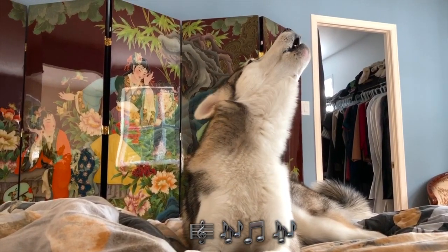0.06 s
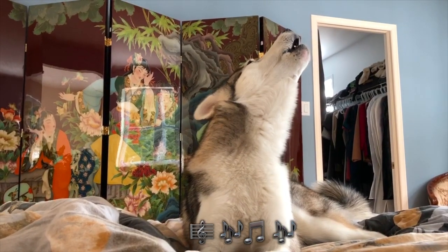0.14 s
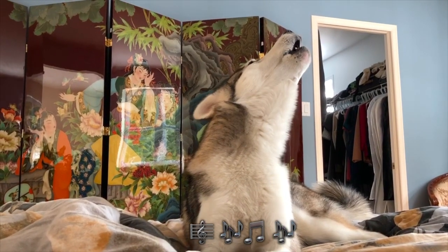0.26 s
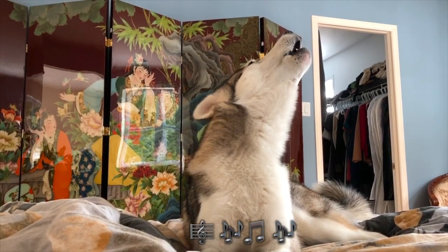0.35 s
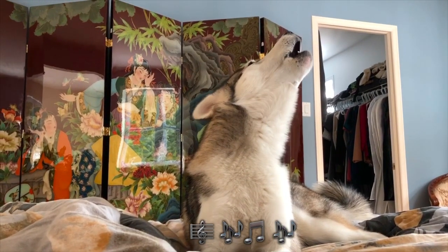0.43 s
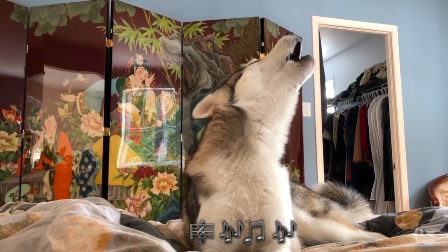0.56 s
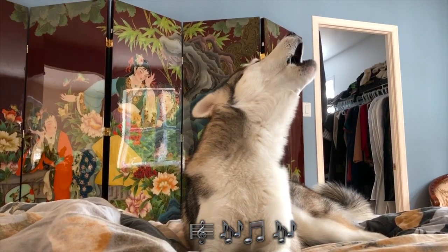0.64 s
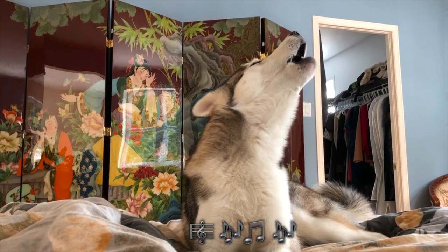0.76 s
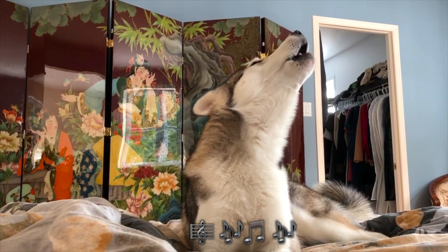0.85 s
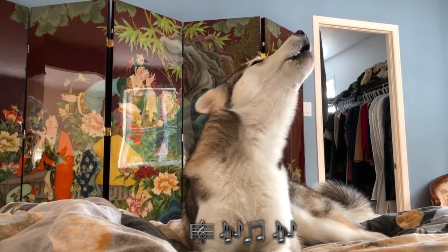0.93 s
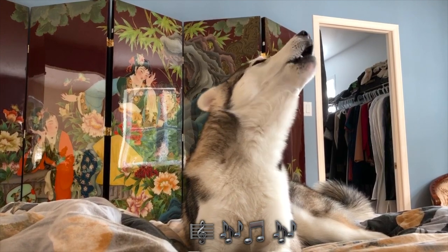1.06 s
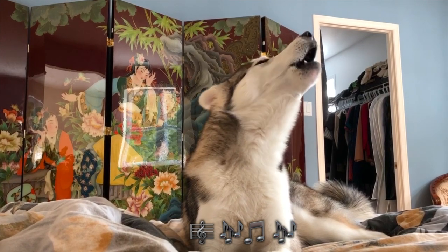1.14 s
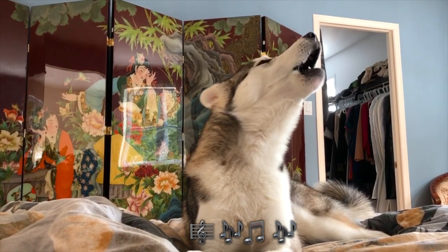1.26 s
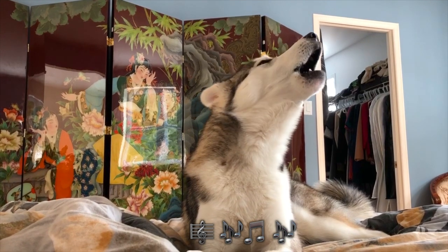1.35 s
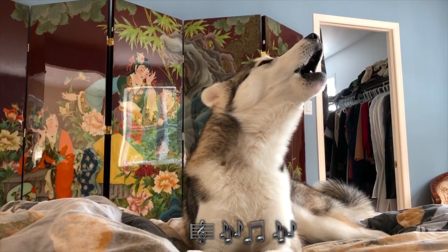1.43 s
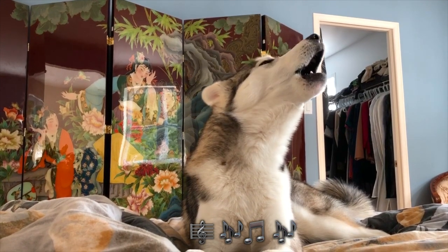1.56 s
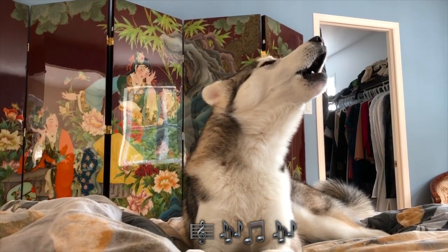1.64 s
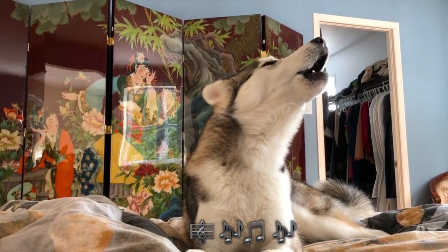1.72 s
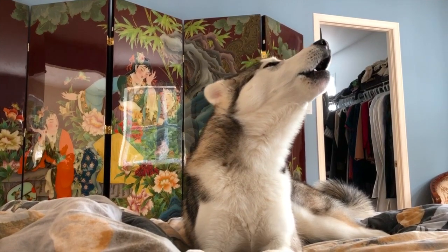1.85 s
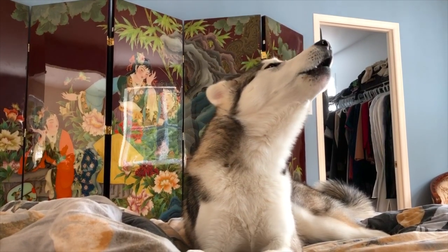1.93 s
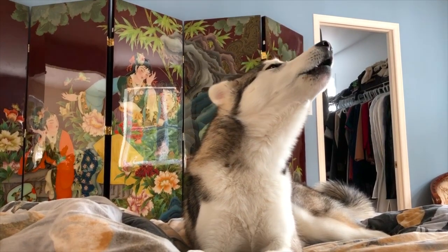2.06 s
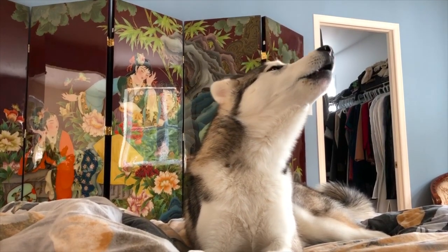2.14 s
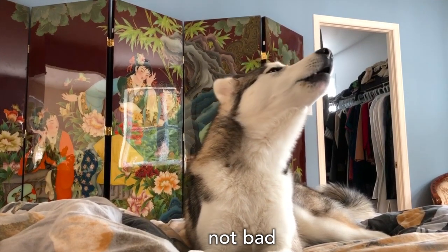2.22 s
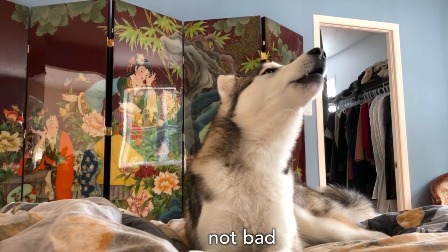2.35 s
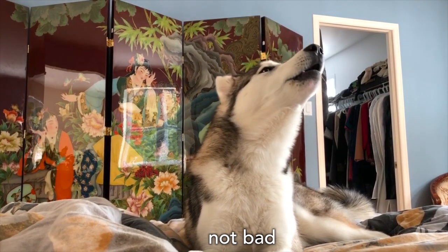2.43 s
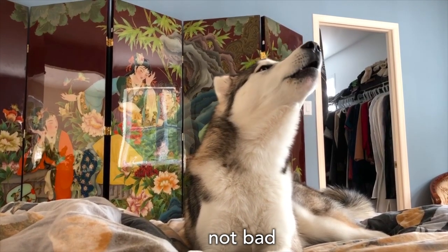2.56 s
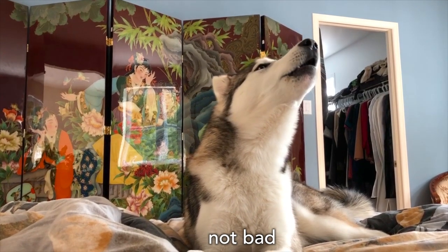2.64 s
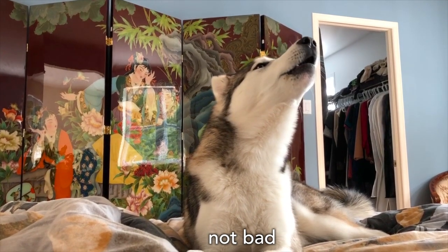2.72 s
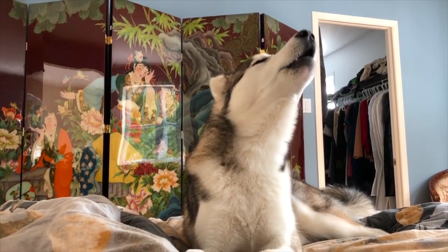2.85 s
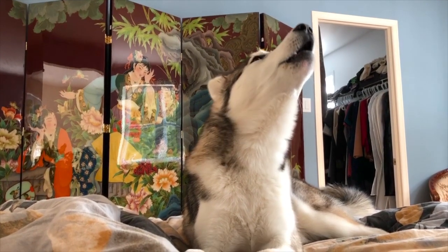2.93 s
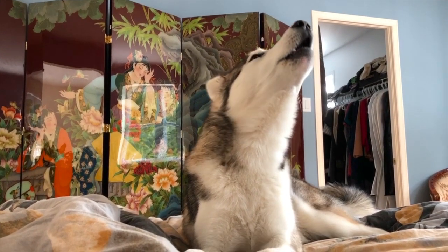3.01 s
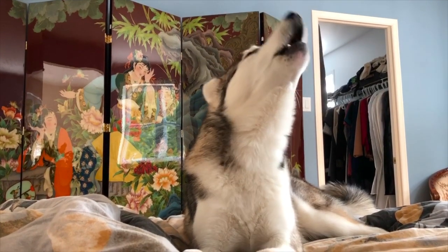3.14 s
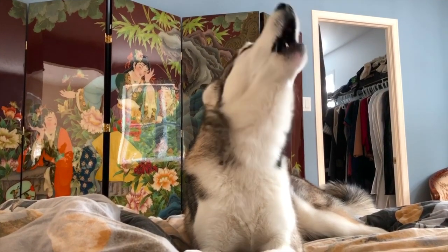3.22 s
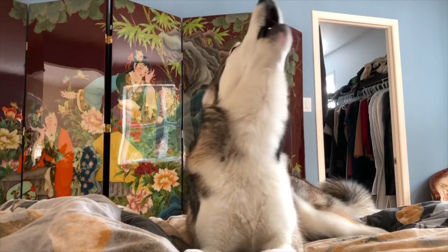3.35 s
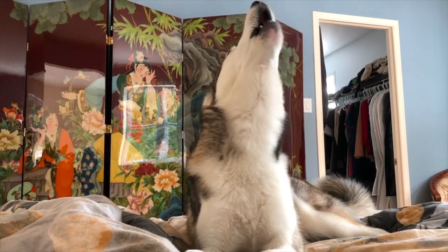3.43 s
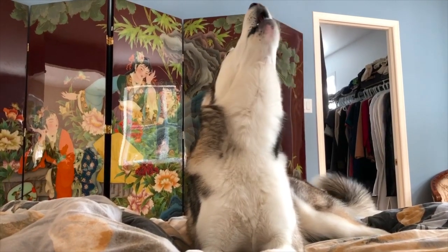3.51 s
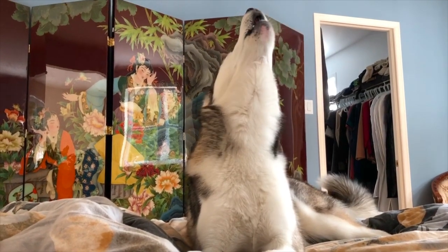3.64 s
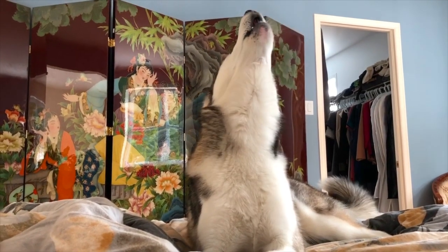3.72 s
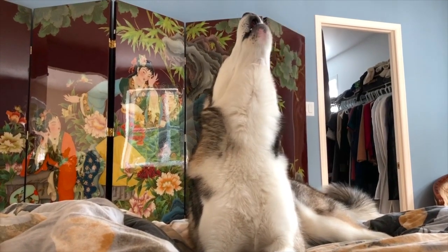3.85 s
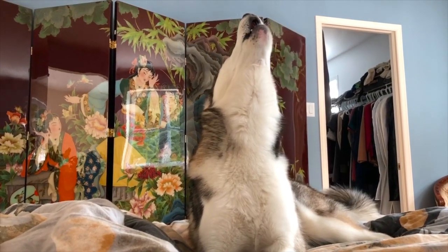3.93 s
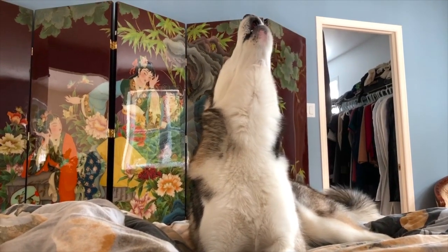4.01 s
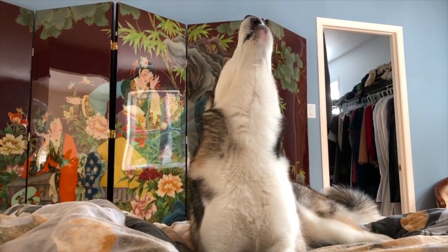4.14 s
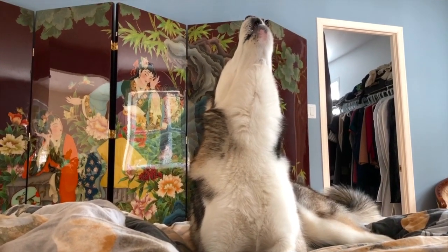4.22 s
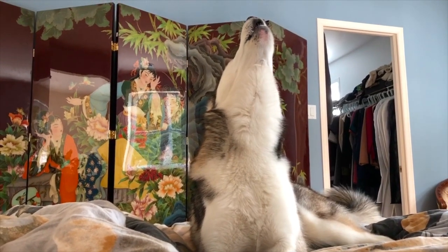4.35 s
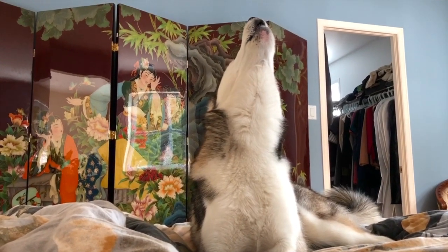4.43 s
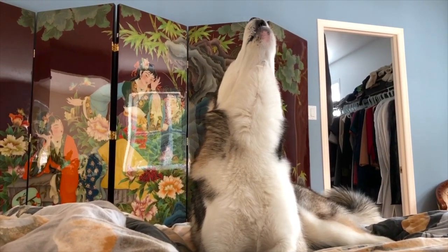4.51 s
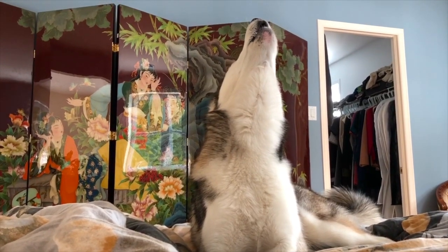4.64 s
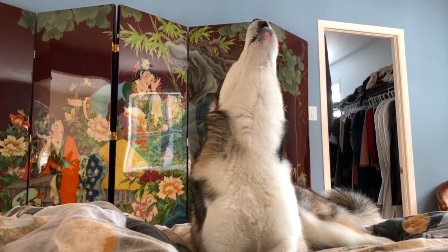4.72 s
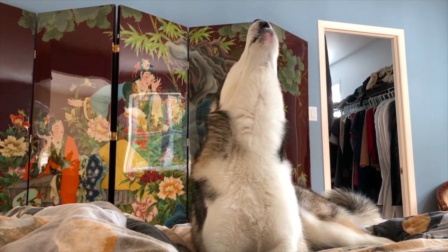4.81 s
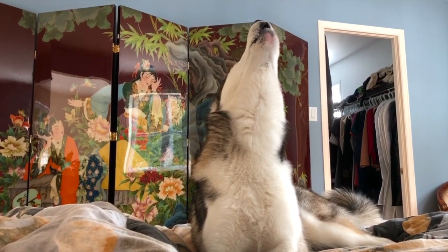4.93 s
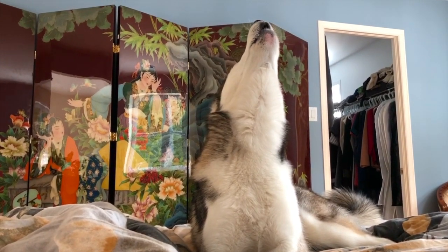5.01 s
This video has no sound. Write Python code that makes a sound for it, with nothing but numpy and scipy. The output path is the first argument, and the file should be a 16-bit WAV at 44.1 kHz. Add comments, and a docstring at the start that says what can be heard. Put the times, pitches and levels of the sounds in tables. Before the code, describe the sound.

In a quiet bedroom with a slight echo, a nearby dog holds a howl that rises and dips, then drops away. A faint, dull howl carries on in the distance while the covers rustle and thump softly. Then the near dog breaks hoarsely into a second, higher howl that slides gradually lower, with the far voice briefly rising underneath it.

```python
"""One long, wavering howl from a husky on a bed, close to the microphone in a small, quiet bedroom.
After a pause a hoarse attack with low puffs breaks into a higher register and sinks back. The vocal
folds give three strong harmonics, the muzzle shapes a bright edge above them, and air escapes with
every cycle. A far fainter howl sounds twice from further off, and the bedding thumps and rustles
softly as the dog shifts. The walls answer briefly, over faint room air and mains hum."""
import sys
import numpy as np
from scipy import signal
from scipy.fft import rfft, irfft, next_fast_len
from scipy.io import wavfile
from scipy.ndimage import uniform_filter1d, map_coordinates

SR = 44100
rng = np.random.default_rng(int(sys.argv[2]) if len(sys.argv) > 2 else 0)


def inscribe(sig):
    """Save sig as 16-bit PCM at rate SR to the path in sys.argv[1].

    A 1-D sig is mono; a 2-D sig holds one channel per row.
    Samples are clipped to [-1, 1] before scaling.
    """
    pcm = np.round(np.clip(np.atleast_2d(sig).T, -1, 1) * 32767)
    wavfile.write(sys.argv[1], SR, pcm.astype(np.int16))


N = 223807
TOP_HZ = 15700  # band limit of the phone


def amp(db):
    """Decibels to gain."""
    return 10 ** (np.asarray(db) / 20)


def along(points, hz):
    """Read (freq_hz, value) points on a log frequency axis."""
    freq_hz, values = np.transpose(points)
    return np.interp(np.log(hz + 1), np.log(freq_hz + 1), values)


def curves(rows):
    """One value per sample for each column after the time."""
    time_s, *columns = np.transpose(rows)
    return [np.interp(np.arange(N) / SR, time_s, column) for column in columns]


def glide(rows):
    """Curves with rounded corners, as muscles move."""
    return [uniform_filter1d(curve, size=500) for curve in curves(rows)]


def sounding(rows, fade_s):
    """1 during the span of a table, fading quickly outside it."""
    t = np.arange(N) / SR
    outside_s = np.maximum(0, np.maximum(rows[0][0] - t, t - rows[-1][0]))
    return np.exp(-(outside_s / fade_s) ** 2)


def wobble(rate_hz):
    """A smooth random curve through rate_hz knots a second."""
    step = max(1, int(SR / rate_hz / 6))
    coarse = np.arange(0, N + step, step)
    knots = rng.standard_normal(int(N * rate_hz / SR) + 4)
    spline = map_coordinates(knots, [coarse * rate_hz / SR], mode="nearest")
    return np.interp(np.arange(N), coarse, spline)


def filtered(x, response):
    """Apply a gain that depends on frequency."""
    size = next_fast_len(N + SR // 2)
    return irfft(rfft(x, size) * response(np.fft.rfftfreq(size, 1 / SR)), size)[..., :N]


def coloured(x, colour):
    """Filter by (freq_hz, gain_db) points."""
    return filtered(x, lambda hz: amp(along(colour, hz)))


def noise(colour):
    """Coloured noise of rms 1."""
    x = coloured(rng.standard_normal(N), colour)
    return x / np.sqrt(np.mean(x ** 2) + 1e-20)


def room_tone():
    """Very faint room air with a mains hum."""
    # spectrum of the still room: freq_hz, gain_db
    air_colour = [(25, 0.5), (80, -3), (200, -11), (600, -4.5), (2000, -21.5), (8000, -35), (15000, -19.5)]
    hum = np.sin(2 * np.pi * 119 * np.arange(N) / SR) * (1 + .15 * wobble(5.5))
    return amp(-80) * noise(air_colour) + amp(-82.5) * hum


def bedroom(x):
    """The nearby walls answer with a short tail that lasts longest in the midrange."""
    # reverberation time: freq_hz, t60_s
    decay = [(120, 0.077), (500, 0.47), (1400, 0.53), (6000, 0.24), (14000, 0.37)]
    hz, t, bands = signal.stft(rng.standard_normal(SR * 3 // 4), SR, nperseg=256)
    tail = signal.istft(bands * amp(-60 * t / along(decay, hz)[:, None]), SR, nperseg=256)[1]
    impulse = np.pad(tail / np.linalg.norm(tail), (200, 0))  # arrives 4.5 ms late
    wet = signal.fftconvolve(x, impulse)[:N]
    # the raised muzzle throws the treble at the walls
    return coloured(wet, [(150, -14), (500, -7), (1400, -8), (3000, -2.5), (6000, -3)])


def puffs(rows, colour, rise_s):
    """Short swells of noise, each falling 40 dB over its length."""
    t = np.arange(N) / SR
    envelope = np.zeros(N)
    for start_s, level_db, length_s in rows:
        age_s = np.maximum(t - start_s, 0)
        envelope += amp(level_db - 40 * age_s / length_s) * (1 - np.exp(-age_s / rise_s))
    return envelope * noise(colour)


def rustle_and_thumps():
    """Rustling covers and soft low thumps as the dog shifts; stronger low puffs with the hoarse attack."""
    # low thumps and puffs, and small crinkles of cloth: start_s, level_db, length_s
    low_events = [(2.475, -47, 0.067), (2.84, -49.5, 0.16), (3.208, -25.5, 0.058), (3.335, -39, 0.061),
                  (3.41, -51, 0.082)]
    crinkle_events = [(2.115, -54.5, 0.017), (2.345, -61.5, .02), (2.47, -57.5, 0.021), (2.835, -53, 0.025),
                      (2.865, -57.5, 0.097)]
    # fur rubbing on the covers: time_s, level_db
    rustle_levels = [(0, -95), (1.9, -89.5), (2.25, -72), (2.42, -69.5), (2.62, -68.5), (2.78, -66.5),
                     (2.87, -66.5), (2.95, -69), (3.2, -63), (3.43, -55.5), (3.52, -80)]
    # spectra of the low thumps and puffs, the rubbing and the crinkles: freq_hz, gain_db
    low_colour = [(25, -10), (70, -6), (130, 10.5), (230, 11), (400, -18), (900, -20), (3000, -61)]
    rustle_colour = [(25, -11.5), (80, -2.5), (220, -7.5), (600, -12.5), (1500, -21.5), (4000, -25),
                     (7500, -21.5), (11000, -37), (15000, -48)]
    crinkle_colour = [(500, -5), (3000, -10.5), (7000, -5), (11000, -20.5), (15000, -25)]
    crinkles = puffs(crinkle_events, crinkle_colour, rise_s=.0038)
    rustle_db, = curves(rustle_levels)
    rustle = amp(rustle_db) * noise(rustle_colour)
    return rustle + puffs(low_events, low_colour, rise_s=.0034) + crinkles


def fold_phase(pitch, rough, jitter, waver):
    """Phase of the vocal folds: a slow waver, and cycle jitter that grows with roughness."""
    unsteady = 1 + waver * wobble(35) + jitter * rough * wobble(400)
    hz = uniform_filter1d(pitch, size=500) * unsteady
    return 2 * np.pi * np.cumsum(hz) / SR


def overtones(pitch, phase, active, colour, jaw, drift_db, blur_rad, orders):
    """Upper harmonics through a colour; they share a constant power, trading it as they drift."""
    samples = np.flatnonzero(active)
    coarse = samples[::64]

    def drift(hop):
        """A random line with a knot every hop samples."""
        knots = np.arange(0, N, hop)
        return np.interp(coarse, knots, rng.standard_normal(len(knots)))

    gains = []
    for k in orders:
        hz = k * pitch[coarse]
        gain_db = along(colour, hz / jaw[coarse]) + drift_db * drift(4400)
        gains.append(amp(gain_db) * (hz < TOP_HZ))
    gains = np.array(gains) / np.linalg.norm(gains, axis=0)
    tone = np.zeros(N)
    for k, gain in zip(orders, gains):
        phase_blur = np.interp(samples, coarse, blur_rad * drift(700))
        tone[samples] += np.interp(samples, coarse, gain) * np.sin(k * phase[samples] + phase_blur)
    return tone


def far_howl(rows, upper_db):
    """A dull, nasal howl from further off; its overtones waver on the way."""
    # resonances of the distant voice: freq_hz, gain_db
    nasal_colour = [(880, -12), (1000, -20.5), (1350, -24.5), (1780, -46.5), (2220, -22), (2650, -54),
                    (3080, -19), (3550, -40.5), (4500, -57.5), (5400, -43), (6500, -54)]
    pitch, level_db = glide(rows)
    gate = sounding(rows, fade_s=.057)
    phase = fold_phase(pitch, rough=.05, jitter=.15, waver=.0064)
    upper = overtones(pitch, phase, gate > 1e-4, nasal_colour, jaw=np.ones(N),
                      drift_db=8.5, blur_rad=1.5, orders=range(2, 14))
    return np.sqrt(2) * gate * amp(level_db) * (np.sin(phase) + amp(upper_db) * upper)


def distant_howls():
    """Two faint calls well away from the microphone: one sinks, the later, brighter one rises."""
    # course of each call: time_s, pitch_hz, level_db
    sinking = [(1.5, 537, -54), (1.95, 514.7, -47.5), (2.12, 473.7, -47), (2.24, 458, -39),
               (2.41, 474, -46), (2.5, 451.4, -36.5), (2.68, 436.7, -39), (2.88, 451.6, -40.5),
               (2.95, 431, -35.5), (3.08, 421.3, -41), (3.17, 412, -48.5)]
    rising = [(4.35, 417.6, -44.5), (4.7, 470, -44.5), (4.78, 483, -52.5), (5.07, 526, -45)]
    return far_howl(sinking, upper_db=-21.5) + far_howl(rising, upper_db=-11.5)


def flutter(x, gap_s=.097, scatter_s=.022, shallow_db=-4, width_s=.0043):
    """The lowest tone, around 460 Hz, dips briefly again and again and trembles faintly in between."""
    # the deepest dips, among many shallow, loosely spaced ones: time_s, depth_db
    deep_dips = [(.689, -18.5), (.86, -7), (.996, -19), (1.681, -15), (2.171, -13), (2.343, -12),
                 (2.406, -17), (2.66, -22), (2.898, -19), (3.051, -12), (4.57, -5.5)]
    chance = rng.standard_normal((120, 2))
    shallow_times = gap_s * np.arange(len(chance)) + scatter_s * chance[:, 0]
    shallow_depths = shallow_db * np.abs(1 + .6 * chance[:, 1])
    dips = np.vstack([deep_dips, np.column_stack([shallow_times, shallow_depths])])
    time_s, depth_db = dips[(dips[:, 0] > 0) & (dips[:, 0] < (N - 1) / SR)].T
    marks = np.bincount(np.round(time_s * SR).astype(int), depth_db, N)
    lag_s = np.arange(-2000, 2001) / SR
    dip_db = signal.fftconvolve(marks, np.exp(-(lag_s / width_s) ** 2), "same")
    tremble = .016 * np.sin(2 * np.pi * 172 * np.arange(N) / SR) + .045 * wobble(100)
    lowest_tone = filtered(x, lambda hz: 1 / (1 + ((hz - 460) / 130) ** 8))
    change = lowest_tone * (amp(dip_db) - 1 + tremble)
    return x + filtered(change, lambda hz: 1 / (1 + ((hz - 470) / 190) ** 8))


def roughness(clear=.011):
    """A clear voice that cracks hoarse for a moment where it starts, stops or changes register."""
    # cracks of the voice: time_s, roughness (0-1), width_s
    cracks = [(1.933, .1, 0.029), (3.21, .4, .018), (3.281, .06, 0.048), (3.353, 0.15, 0.015),
              (4.221, 0.03, 0.098)]
    t = np.arange(N) / SR
    return clear + sum(rough * np.exp(-((t - time_s) / width_s) ** 2) for time_s, rough, width_s in cracks)


def resonance_gain(hz):
    """A gliding harmonic swells and fades as it passes through the resonances of mouth and room."""
    # response of mouth and room: freq_hz, gain_db
    resonances = [(350, -6), (420, -3), (490, 1.5), (645, -2), (680, -10.5), (890, -13.5), (950, -21),
                  (1000, -19.5), (1035, -12), (1140, -8.5), (1280, 2), (1335, 6), (1400, -2.5), (1440, 3.5),
                  (1505, -8), (1560, 1), (1850, -9), (1950, -2), (2110, -9)]
    # narrow bands that standing waves cancel at the microphone: centre_hz, width_hz, depth_db
    nulls = [(448.8, 4.5, -12.5), (502.5, 1.9, -5.5)]
    null_db = sum(depth * np.exp(-((hz - centre) / width) ** 2) for centre, width, depth in nulls)
    return uniform_filter1d(amp(along(resonances, hz) + null_db), size=500)


def howl(pitch_rows, effort_rows, edge_rows, throat, *,
         rest_hz, jaw_lift, press_db, edge_db, air_db, drift_db, blur_rad):
    """Three strong low harmonics, a bright edge of overtones shaped by the muzzle, and pulsing air."""
    # balance of the three lowest harmonics at the folds: gain_db
    low_harmonics = [0.5, -1.5, -17]
    # air rushing through the open throat: freq_hz, gain_db
    air_colour = [(300, -21), (550, 3), (1400, -.5), (2000, -23), (2650, -30), (3400, -7.5), (4150, -17),
                  (5400, -1.5), (6000, -7.5), (6800, -2), (7700, -8), (8350, -24), (9300, -16.5),
                  (10300, -28.5), (11600, -21.5), (13000, -45.5), (15500, -42.5)]
    pitch, = curves(pitch_rows)
    voice_db, = glide(effort_rows)
    bright_db, = glide(edge_rows)
    rough = roughness()
    gate = np.maximum(sounding(pitch_rows, fade_s=.004), sounding(edge_rows, fade_s=.004))
    phase = fold_phase(pitch, rough, jitter=.11, waver=.0013)
    body = np.zeros(N)
    for k, gain_db in enumerate(low_harmonics, 1):
        # pressed folds add press_db with each step up the harmonics
        body += amp(gain_db + press_db * (k - 1)) * resonance_gain(k * pitch) * np.sin(k * phase)
    # the jaw opens as the pitch rises, which shortens the tract and lifts its resonances
    jaw = (pitch / rest_hz) ** jaw_lift
    edge = overtones(pitch, phase, gate > 1e-6, throat, jaw, drift_db, blur_rad, orders=range(4, 30))
    tone = np.sqrt(2) * (amp(voice_db) * body + amp(bright_db + edge_db) * edge)
    tone *= 1 + .87 * rough * wobble(220)  # uneven cycles make the loudness shimmer
    tone *= 1 + np.maximum(rough - .05, 0) * np.sin(phase / 2)  # hoarse cycles alternate strong and weak
    # air escapes once a cycle, more of it when the voice is hoarse
    air = noise(air_colour) * (1 + .5 * np.cos(phase)) * amp(bright_db + air_db) * np.sqrt(rough)
    return gate * (tone + air)


def husky():
    """Close to the microphone: the long howl, then the hoarse attack that flips into the high howl."""
    # pitch of the vocal folds: time_s, pitch_hz
    long_pitch = [(0, 474.9), (.43, 475.2), (.558, 496.9), (.79, 521.2), (.89, 491.4), (.954, 457.7),
                  (1.032, 437.7), (1.226, 456), (1.352, 474.6), (1.482, 479.9), (1.602, 467), (1.7, 441.9),
                  (1.884, 423.4), (1.916, 410), (1.94, 358.7)]
    attack_pitch = [(3.2, 298.2), (3.218, 354), (3.228, 417.6), (3.25, 460.6), (3.28, 510.3), (3.3, 511.8),
                    (3.35, 561.3), (3.365, 615)]
    high_pitch = [(3.37, 688), (3.412, 700.6), (3.602, 673), (4.08, 637.2), (4.174, 598.4), (4.226, 566.7),
                  (4.25, 504), (4.472, 478.8), (4.808, 458.6), (4.936, 444.5), (5.07, 439.7)]
    # how hard the dog pushes the low harmonics: time_s, gain_db
    long_effort = [(.35, -25.5), (.55, -20.5), (0.651, -25.5), (.85, -19), (1.099, -21), (1.451, -21),
                   (1.72, -24.5), (1.9, -20.5), (1.951, -33.5)]
    attack_effort = [(3.201, -55), (3.21, -17.5), (3.231, -10.5), (3.251, -14.5), (3.288, -20),
                     (3.303, -13), (3.329, -22.5), (3.343, -16), (3.365, -27.5)]
    high_effort = [(3.356, -20.5), (3.4, -12), (3.56, -17), (3.72, -24.5), (3.85, -19.5), (4.1, -23.5),
                   (4.45, -21.5), (4.6, -24.5), (4.78, -20.5), (5.07, -21)]
    # strength of the bright edge and the air: time_s, gain_db
    long_edge = [(0.02, -44), (0.106, -46), (0.472, -40.5), (0.506, -43), (0.636, -33), (1.106, -45),
                 (1.122, -39), (1.354, -36.5), (1.954, -49), (1.96, -59)]
    attack_edge = [(3.2, -43.5), (3.23, -25), (3.256, -26), (3.274, -37), (3.284, -41.5), (3.302, -20.5),
                   (3.352, -37), (3.365, -32)]
    high_edge = [(3.358, -29.5), (3.562, -34.5), (3.82, -31.5), (4.016, -37.5), (4.072, -35), (4.206, -41),
                 (4.316, -37), (4.512, -42.5), (4.998, -35.5), (5.07, -40)]
    # throat and muzzle resonances above the third harmonic: freq_hz, gain_db
    long_throat = [(1600, -5), (1950, -3), (2300, -12), (2700, -40), (3100, -17.5), (3500, -9.5),
                   (4100, -31), (4750, -19.5), (5450, 4), (6050, -12.5), (6600, 4.5), (7400, -16),
                   (8100, -20.5), (8600, -24.5), (10300, -49.5), (12000, -39.5), (13000, -46.5),
                   (15500, -57.5)]
    attack_throat = [(1600, 6), (2000, 2.5), (2700, -26.5), (3200, -7), (4200, -34), (4900, -12.5),
                     (5600, 9), (6200, 8), (6900, -1.5), (7800, -8.5), (10000, -29), (11500, -32.5),
                     (15000, -53)]
    high_throat = [(1800, -7), (2300, -14.5), (2700, -31), (3450, -11.5), (4100, -20.5), (4600, -14.5),
                   (5400, 4), (6000, -12), (6650, 2.5), (7600, -11.5), (8400, -34), (9300, -25.5),
                   (10400, -49), (11700, -40.5), (13000, -53), (13800, -42.5), (15500, -57.5)]
    long = howl(long_pitch, long_effort, long_edge, long_throat, rest_hz=478, jaw_lift=.15,
                press_db=.5, edge_db=-1, air_db=-6, drift_db=5, blur_rad=.06)
    attack = howl(attack_pitch, attack_effort, attack_edge, attack_throat, rest_hz=509.6, jaw_lift=.46,
                  press_db=2.5, edge_db=-1, air_db=-12, drift_db=6.5, blur_rad=.1)
    high = howl(high_pitch, high_effort, high_edge, high_throat, rest_hz=616, jaw_lift=.07,
                press_db=-1.5, edge_db=-1.5, air_db=-1.5, drift_db=6, blur_rad=.067)
    # the muzzle radiates no bass
    return filtered(long + attack + high, lambda hz: 1 - 1 / (1 + (hz / 240) ** 8))


def scene():
    """The near dog, its bedding and the distant howls reach one microphone in the bedroom."""
    near = husky() + rustle_and_thumps()
    far = distant_howls()
    # the distant overtones arrive mostly by way of the walls
    scattered = coloured(far, [(500, 2.3), (900, 10), (3000, 3.9)])
    walls = bedroom(near + scattered)
    return (flutter(near + far + walls) + room_tone())[None]


def record(dry):
    """The phone keeps nothing above its band limit."""
    return filtered(dry, lambda hz: hz < TOP_HZ)


dry = scene()
out = record(dry)
inscribe(out)
```